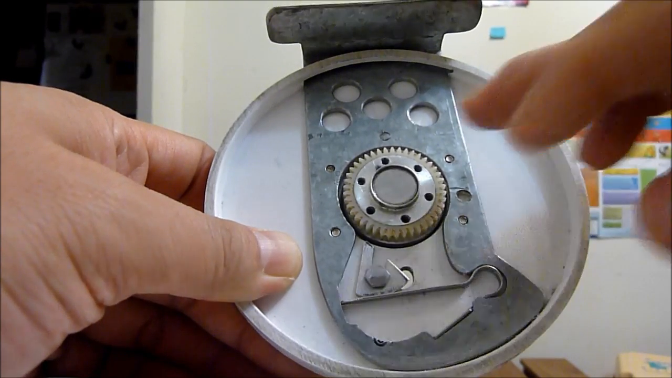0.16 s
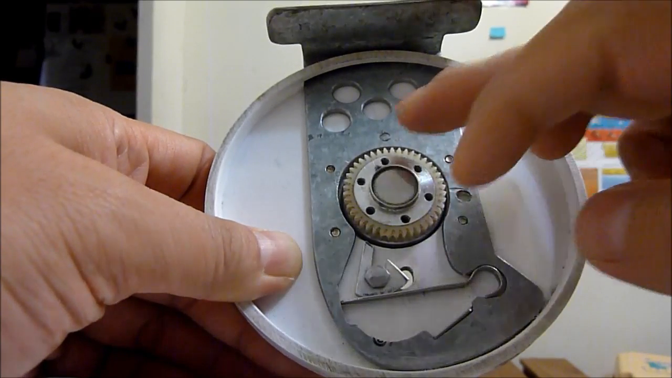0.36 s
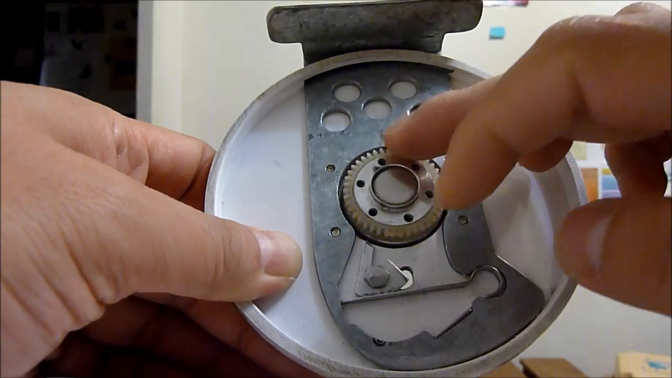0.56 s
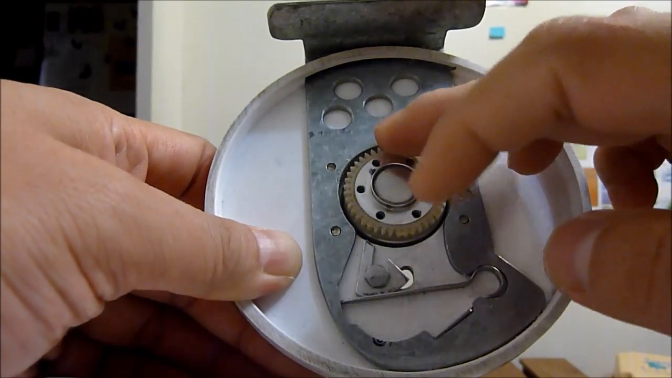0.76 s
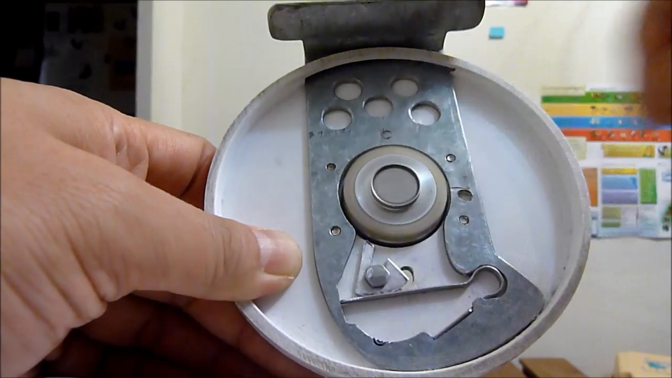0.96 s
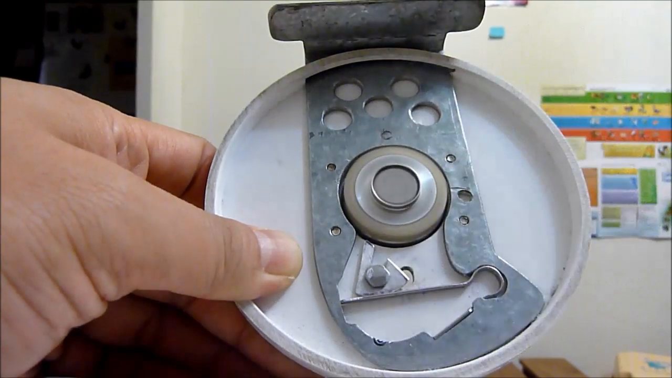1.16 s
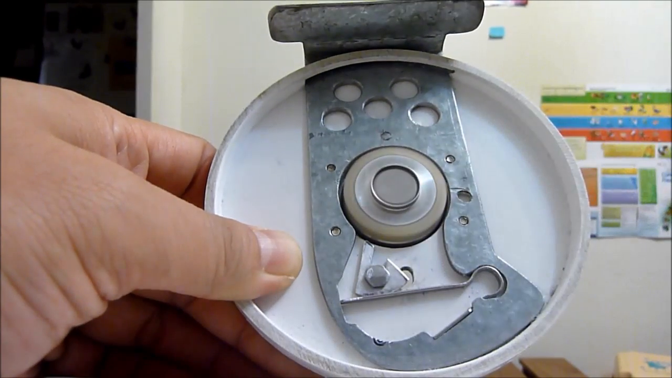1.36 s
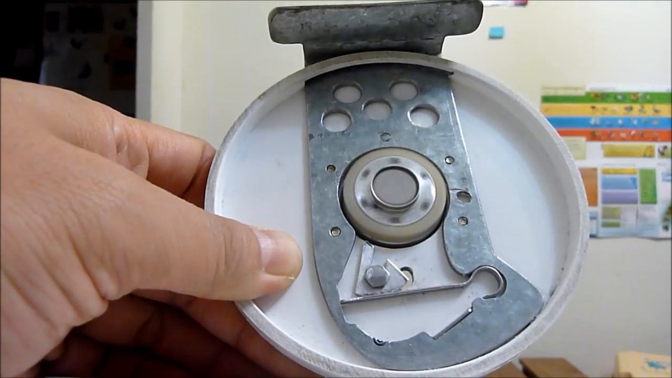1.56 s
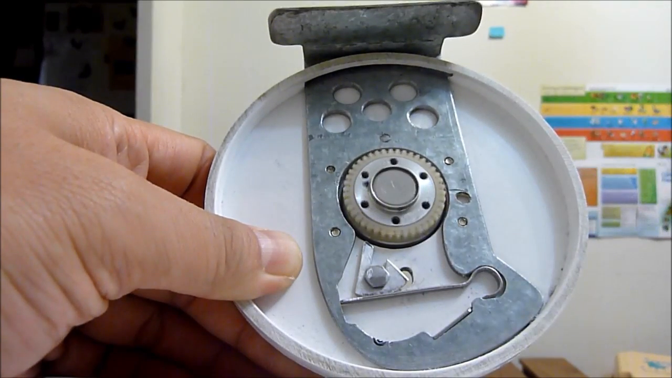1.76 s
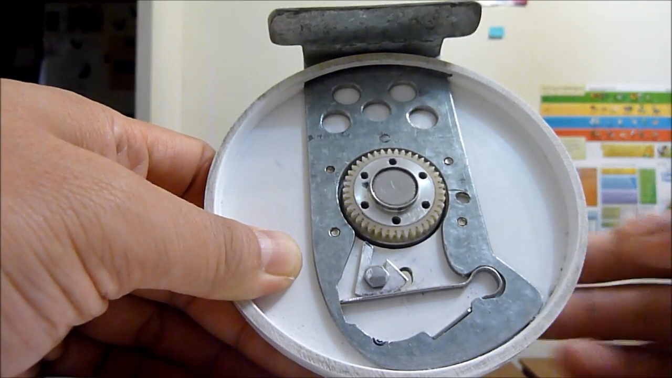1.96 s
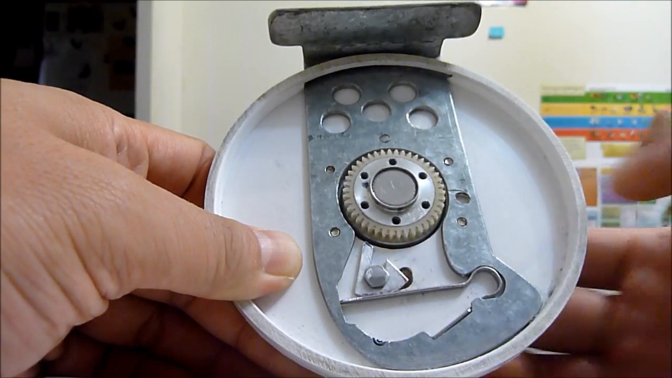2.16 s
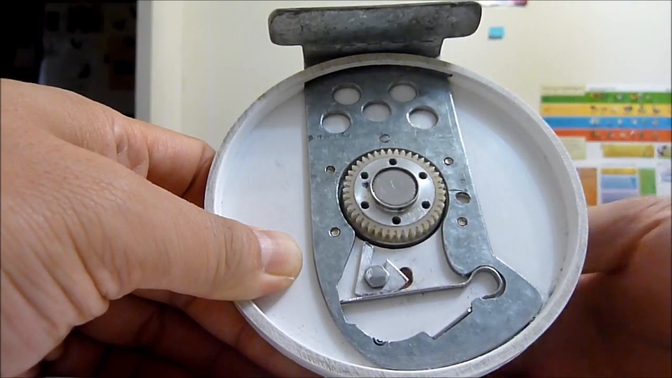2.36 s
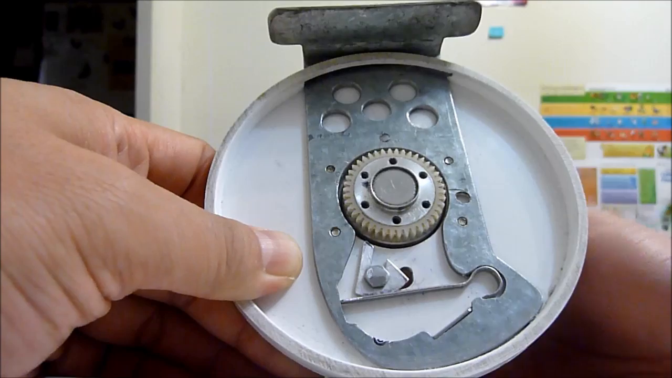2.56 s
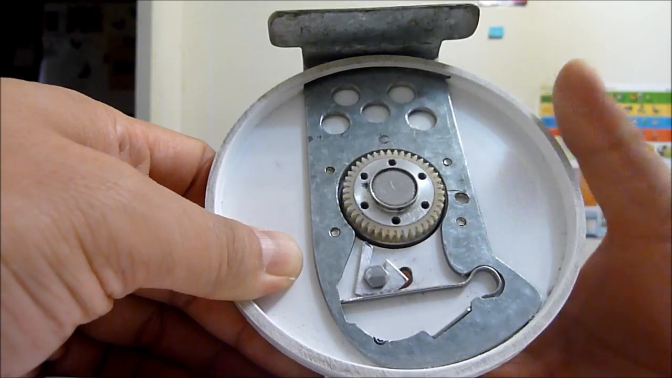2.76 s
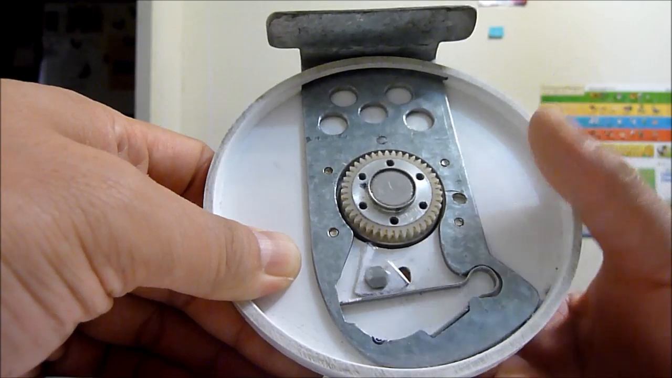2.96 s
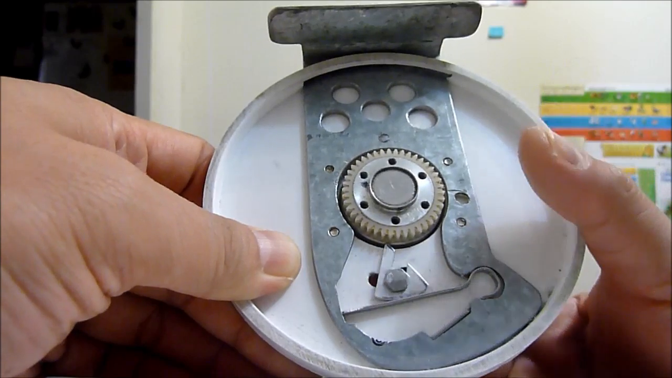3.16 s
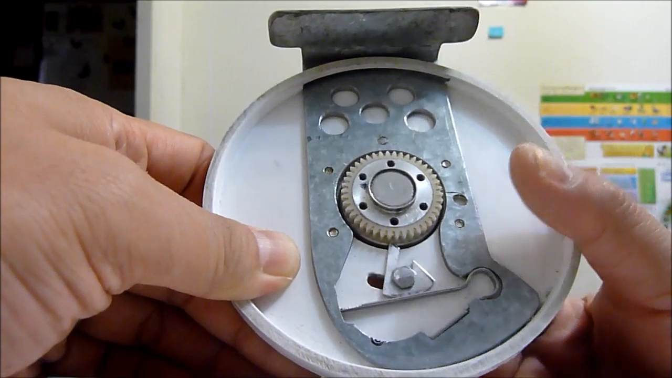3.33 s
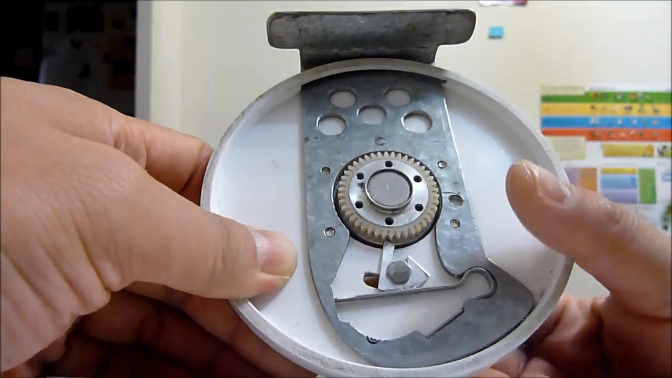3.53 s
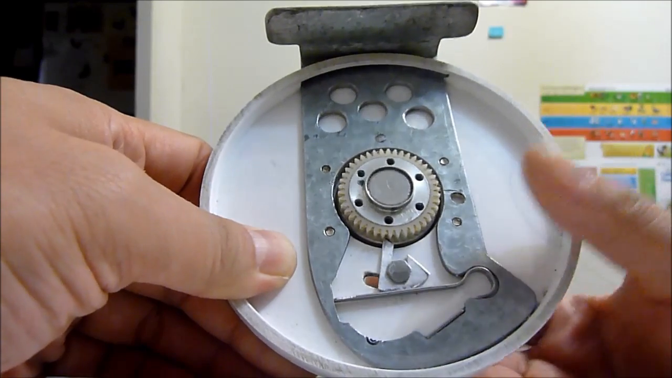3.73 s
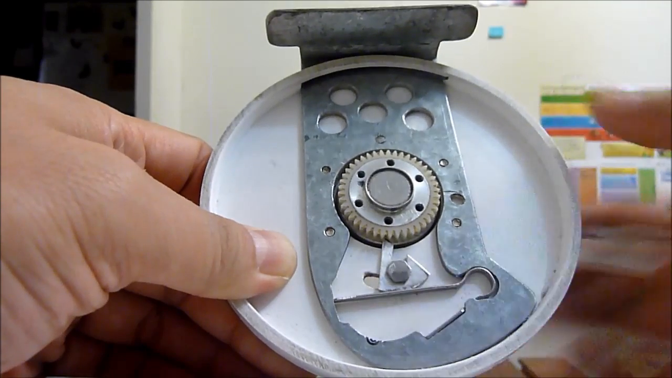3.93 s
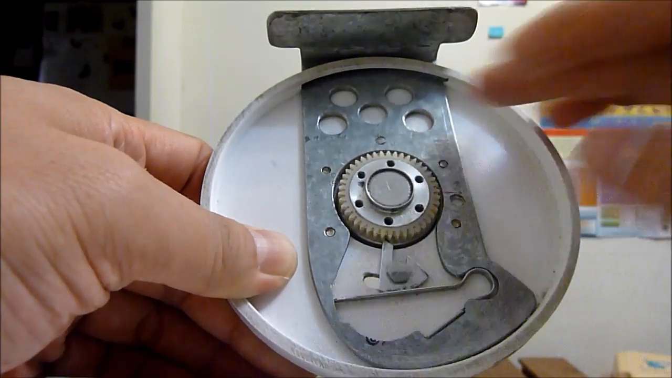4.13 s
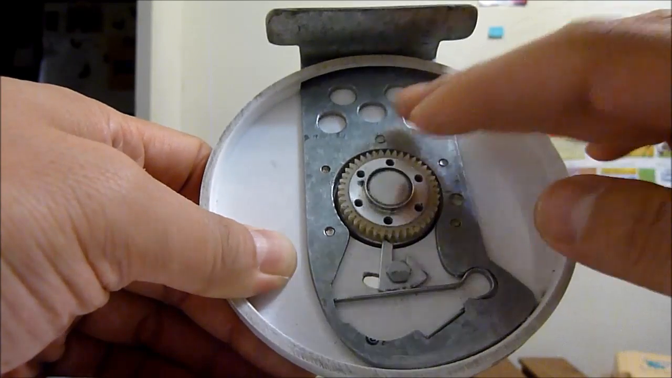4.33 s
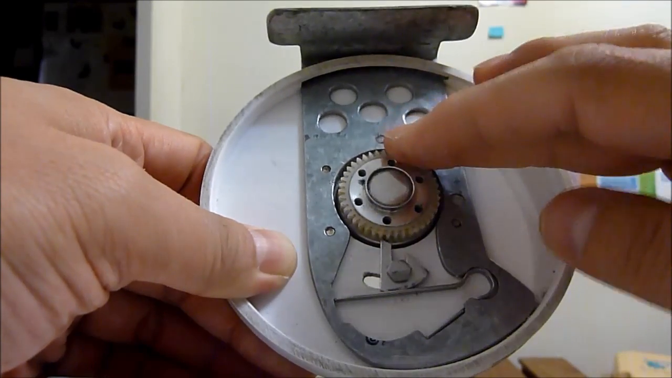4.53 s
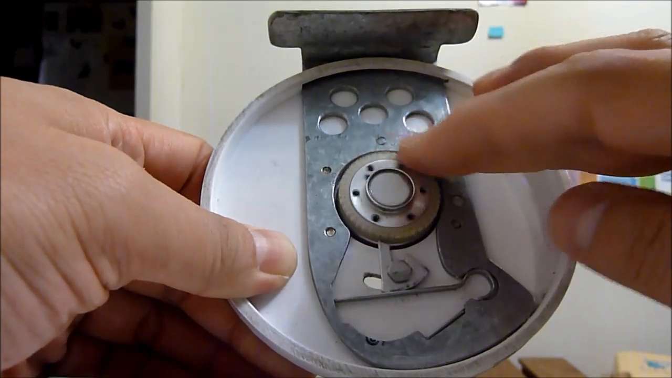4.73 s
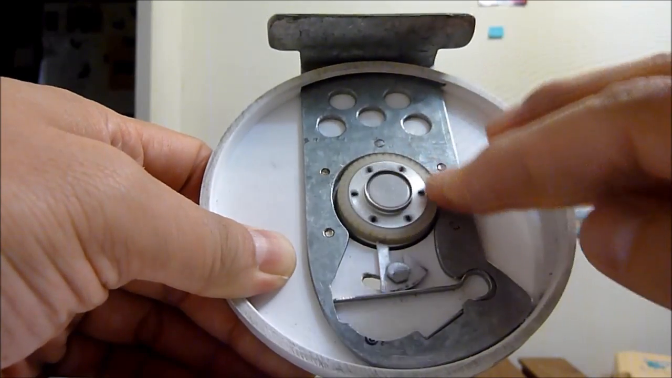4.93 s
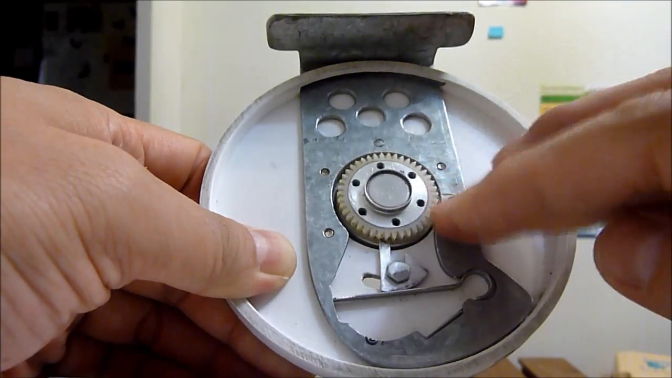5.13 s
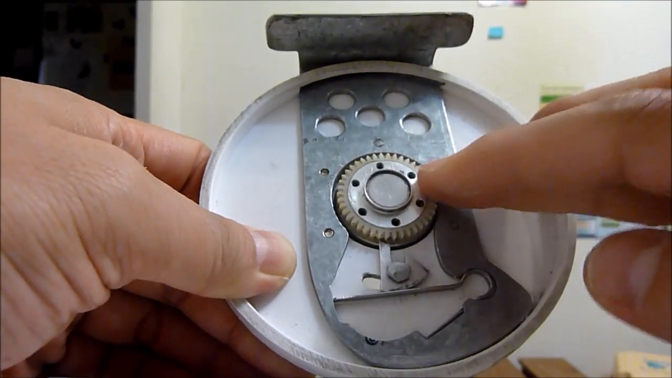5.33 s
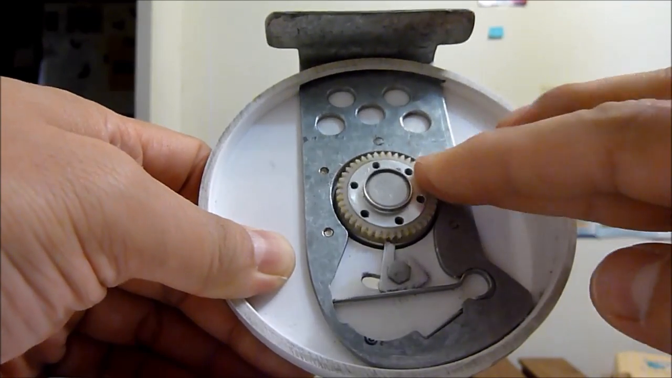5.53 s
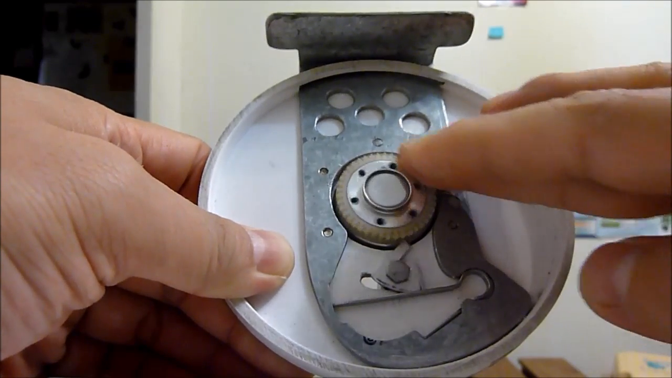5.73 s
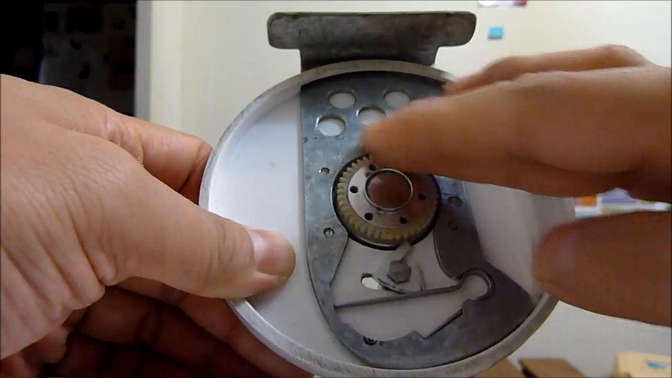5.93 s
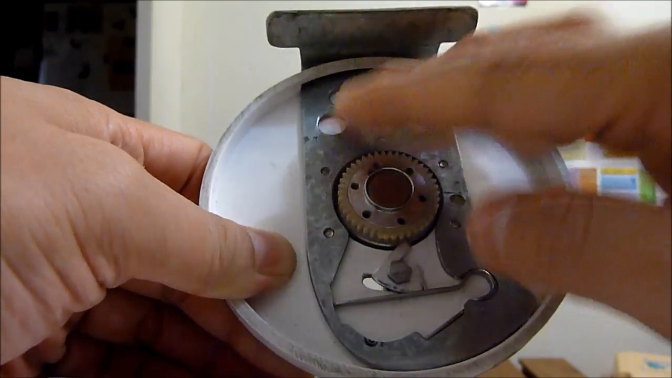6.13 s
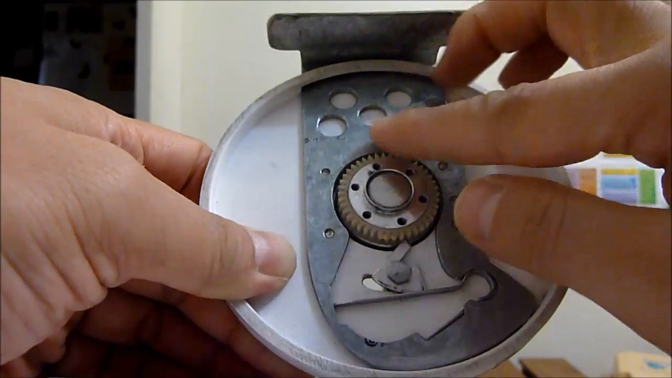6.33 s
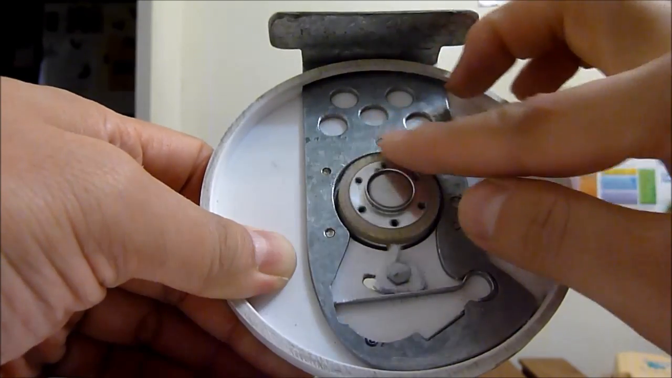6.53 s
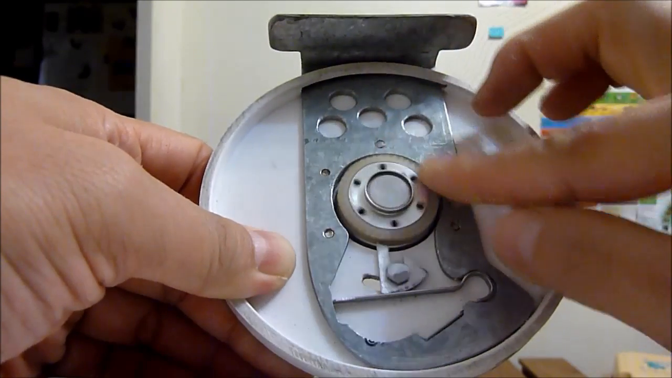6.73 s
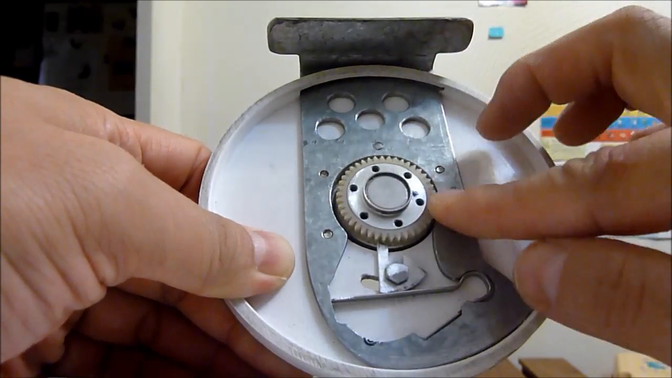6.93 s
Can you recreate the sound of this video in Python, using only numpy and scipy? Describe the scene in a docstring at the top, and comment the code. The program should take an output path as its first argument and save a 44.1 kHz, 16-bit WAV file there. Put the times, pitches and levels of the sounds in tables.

```python
"""A small room, with an open fishing reel handled close to a narrow-band stereo microphone.
A finger spins the free spool, the hand knocks and rubs on the frame while it slides the pawl in,
then turns the gear in three short bursts: the sprung pawl snaps over each tooth and rings the metal.
Far off, over steady room noise, a small bird or insect chirps at an even pace."""
import sys
import numpy as np
from scipy import signal
from scipy.fft import rfft, irfft, next_fast_len
from scipy.io import wavfile

SR = 44100
rng = np.random.default_rng(int(sys.argv[2]) if len(sys.argv) > 2 else 0)


def transcribe(signal):
    """Save signal, clipped to [-1, 1], as a 16-bit WAV file at the path in sys.argv[1]."""
    frames = np.atleast_2d(signal).T
    limited = np.clip(frames, -1, 1)
    pcm = np.round(limited * 32767).astype(np.int16)
    wavfile.write(sys.argv[1], SR, pcm)


N = 308259
TIME = np.arange(N) / SR
FREQ = np.fft.rfftfreq(N, 1 / SR)


def pawl(slip_s=0.00082, slip_db=-15, chatter_s=0.0011, chatter_db=-9,
         rebound_s=0.0016, rebound_db=-13, housing_s=0.002175, housing_db=-17):
    """The pawl slips off a tooth, slams into the next, chatters and rebounds; the housing hums after."""
    # Ring of pawl, spring and gear. Each row: pitch in Hz, width in Hz, level in dB.
    reel_modes = [(727, 120, -46), (923, 53, -11), (1617, 100, -12), (2435, 230, -12), (2713, 67, -29),
                  (3264, 115, -4), (3880, 230, -1), (4446, 250, 6.5), (4950, 350, 4.5), (5630, 370, 2.5),
                  (6050, 380, -4.5), (6930, 210, -15), (6850, 220, -24)]
    # Hum of the shallow housing. Each row: pitch in Hz, width in Hz, level in dB.
    housing_modes = [(500, 620, -22), (621, 46, 4), (732, 65, 1.5), (783, 43, 1), (970, 72, 1.5),
                     (1864, 230, -3.5), (2470, 780, -1.5)]
    lead = 64  # samples ahead of the blow
    out, t = np.zeros(N), (np.arange(4096) - lead) / SR
    for s, db, bass_db, treble_db, lean_db in teeth():
        slip_luck, rebound_luck, strength_luck = rng.standard_normal(3)
        slip_at = max(lead - int(slip_s * SR * (1 + .2 * slip_luck)), 0)
        rebound_at = lead + int(abs(rebound_s * SR * (1 + .25 * rebound_luck)))
        chatter = rng.standard_normal(len(t)) * (t > 0) * np.exp(-np.abs(t) / chatter_s)
        force = undb(chatter_db) * chatter / np.linalg.norm(chatter)
        force[lead] += 1
        force[slip_at] += undb(slip_db)
        force[rebound_at] += undb(rebound_db + 2 * strength_luck)
        # each tooth is met at a slightly different spot, so the modes share the blow differently
        share_hz = [2600, 3800, 4400, 4900, 5500, 6100]
        share_db = [bass_db, 0, lean_db, -lean_db, 0, treble_db]
        modes = [(hz, width, mode_db + 3 * rng.standard_normal() + np.interp(hz, share_hz, share_db))
                 for hz, width, mode_db in reel_modes]
        add(out, s - lead / SR, burst(resonate(force, modes), db))
        hum = butter(resonate(force, housing_modes), 2700, "low")
        add(out, s - lead / SR + housing_s, burst(hum, db + housing_db + bass_db / 2))
    return out


def teeth(bass_rise_db_per_s=44.5, breakaway_db=0.9, breakaway_bass_db=9, seating_s=0.02):
    """Yield each snap's time, level and tone: along a push they weaken, and deepen as the finger presses."""
    # Teeth passing the pawl. Each row: the times in seconds for one push of the finger.
    teeth_s = [
        [4.7314, 4.7625, 4.7955, 4.8204, 4.8514, 4.879, 4.9031, 4.9308, 4.96, 4.9857, 5.008, 5.0649],
        [5.761, 5.7989, 5.845, 5.8776, 5.909],
        [6.656, 6.6825, 6.7123, 6.7366, 6.7639, 6.7866, 6.805, 6.823, 6.839, 6.855, 6.8923],
    ]
    # Pushes on the gear. Each row: level in dB, sag in dB per second, extra bass in dB,
    # extra treble in dB, seconds until the pawl is seated.
    pushes = [(-15.5, 19.5, -6.5, 1, 0.11), (-17.5, 9.5, -1.5, 9, .2), (-15, 28, -5.5, 9, .04)]
    for times, (db, sag, bass_db, treble_db, seated_s) in zip(teeth_s, pushes):
        for s in times:
            age = s - times[0]
            first = s == times[0]  # breaks free from rest: harder, with more bass
            level = db - sag * age + first * breakaway_db + 1.18 * rng.standard_normal()
            bass = bass_db + bass_rise_db_per_s * age + first * breakaway_bass_db
            treble = treble_db + 2.5 * rng.standard_normal()
            # as the pawl seats itself, the ring leans from the 4.9 kHz mode to the 4.4 kHz mode
            lean = 3.6 * np.tanh((age - seated_s) / seating_s)
            yield s, level, bass, treble, lean


def pings(rise_s=0.0016, fade_s=0.0039):
    """A tooth grazes the pawl without passing; the gear rings softly, a little lower under a finger."""
    # Grazes. Each row: start in seconds, level in dB, pitch ratio.
    grazes = [(1.03, -52, 0.96), (1.255, -50, 0.95), (2.097, -50.5, 0.96), (2.149, -44.5, 0.96),
              (2.161, -40.5, 0.96), (2.825, -41, 0.96), (2.998, -53, 1), (6.068, -33, 0.88)]
    # The gear's light ring. Each row: pitch in Hz, width in Hz, level in dB.
    gear_modes = [(930, 220, 5.5), (2200, 280, 2), (3500, 580, -5), (4480, 170, 16.5), (4270, 130, -12),
                  (5090, 130, -30), (5870, 590, -26), (6530, 300, -24)]
    out, t = np.zeros(N), np.arange(4096) / SR
    for s, db, pitch in grazes:
        force = grains(len(t), spread_db=2.5) * (1 - np.exp(-t / rise_s)) * np.exp(-t / fade_s)
        modes = [(hz * pitch, width, mode_db) for hz, width, mode_db in gear_modes]
        add(out, s, burst(resonate(force, modes), db))
    return out


def frame(force, db, contact_hz, shell_db=-2, ring_db=1):
    """A force moves the frame's body, flexes its shell and rings its metal; a soft contact is duller."""
    # Resonances of the hand-held frame, in three groups. Each row: pitch in Hz, width in Hz, level in dB.
    body_modes = [(178, 14, -7.5), (324, 570, -4.5), (543, 188, 3), (797, 21, 4)]
    shell_modes = [(1050, 220, -3.5), (1500, 240, 9), (2050, 1700, 0.5), (2830, 540, -4.5)]
    ring_modes = [(4090, 1000, 16.5), (4527, 120, 12.5), (5100, 500, 17.5), (5900, 270, 20.5),
                  (6640, 400, -49)]
    body = butter(resonate(force, body_modes), [115, 1200], "band")
    shell = butter(resonate(force, shell_modes), [800, 2900], "band", order=4)
    ring = butter(resonate(force, ring_modes), 3300, "high", order=3)
    whole = burst(body, db) + burst(shell, db + shell_db) + burst(ring, db + ring_db)
    return butter(whole, contact_hz, "low", order=3)


def knocks(rattle_db=4, scrape_db=-9):
    """A short scrape leads into a light blow on the frame, and loose parts rattle after it."""
    # Blows. Each row: time in seconds, level in dB, rattle time in seconds, cut-off in Hz.
    blows = [(.905, -37.5, 0.0075, 1500), (0.9117, -40, 0.0017, 9000), (2.6154, -40.5, 0.006, 5250),
             (3.099, -43.5, 0.0042, 750), (3.125, -40.5, 0.0018, 2200), (3.1414, -41, 0.0033, 4600),
             (3.157, -37.5, 0.0053, 4600), (3.2155, -38, .0004, 2200), (3.3001, -35, 0.0024, 9000),
             (3.312, -39, 0.0025, 8100), (3.363, -39.5, 0.0017, 1800), (3.411, -42, 0.00038, 1900),
             (3.477, -52.5, .0026, 4530), (3.51, -52, 0.0041, 3700), (3.781, -55.5, 0.0037, 8000),
             (4.185, -44, .0095, 5900), (6.069, -41, 0.0062, 9070), (6.317, -44, 0.0062, 1200)]
    lead = 882  # samples of scrape
    out, t = np.zeros(N), (np.arange(4096) - lead) / SR
    for s, db, rattle_s, contact_hz in blows:
        rattle = grains(len(t), spread_db=4) * np.exp(-np.abs(t) / rattle_s)
        rattle[:lead] *= undb(scrape_db)
        force = undb(rattle_db) * np.sqrt(rattle_s / 0.0031) * rattle / np.linalg.norm(rattle)
        force[lead] += 1
        add(out, s - lead / SR, frame(force, db, contact_hz))
    return out


def rubs(rise_s=0.00067):
    """Skin sticks and slips on the frame, then slides to rest."""
    # Slides. Each row: start in seconds, level in dB, fade time in seconds, cut-off in Hz.
    slides = [(.92, -49, 0.074, 7000), (2.731, -46, 0.015, 4000), (2.856, -44, 0.01, 1400),
              (2.886, -38.5, 0.025, 3080), (2.955, -47, 0.084, 4200), (3.136, -37, 0.046, 900),
              (3.52, -49.5, 0.041, 3800), (3.742, -48, 0.019, 4000), (4.195, -37.5, 0.038, 2700),
              (4.225, -41.5, 0.078, 850), (4.306, -45, .024, 850), (5.591, -46.5, .015, 3500),
              (5.647, -47, 0.017, 4800), (5.735, -39, 0.028, 2500), (5.979, -44, 0.072, 1300),
              (6.426, -43, 0.016, 2700), (6.66, -35.5, 0.16, 800)]
    out, t = np.zeros(N), np.arange(SR // 2) / SR
    for s, db, fade_s, contact_hz in slides:
        force = grains(len(t), spread_db=4) * (1 - np.exp(-t / rise_s)) * np.exp(-t / fade_s)
        add(out, s, frame(force, db, contact_hz))
    return out


def bump(start_s=1.28, db=-33, soft_hz=640, push_s=0.008):
    """One soft, heavy contact, drawn out over a few milliseconds, wakes only low modes."""
    # Modes of the dull bump. Each row: pitch in Hz, width in Hz, level in dB.
    low_modes = [(178, 22, 7.3), (254, 77, 6), (335, 32, 3.2), (406, 47, 10.4), (497, 35, 3)]
    out, t = np.zeros(N), np.arange(SR // 2) / SR
    force = rng.standard_normal(len(t)) * np.exp(-t / push_s)
    force /= np.linalg.norm(force)
    force[0] += 1
    thud = butter(resonate(force, low_modes), [115, soft_hz], "band", order=5)
    add(out, start_s, burst(thud, db))
    return out


def spool(start_s=0.877, db=-48, rise_s=0.026, coast_s=0.22, fade_db_per_s=56, turn_hz=33, wobble_db=3):
    """Flicked up to speed, the free spool scrapes its shaft, harder once a turn, and runs down."""
    # Resonances of the whirr. Each row: pitch in Hz, width in Hz, level in dB.
    whirr_modes = [(630, 460, 7), (1500, 1800, -7), (4200, 350, 11.5), (5400, 440, -1), (6400, 700, -45)]
    age = np.maximum(TIME - start_s, 0)
    turns = np.cumsum(turn_hz * np.exp(-0.5 * age)) / SR
    force = grains(N, spread_db=5.5) * undb(wobble_db * np.sin(2 * np.pi * turns))
    envelope = np.minimum(age / rise_s, 1) * undb(db - fade_db_per_s * np.maximum(age - coast_s, 0))
    return unit(resonate(force, whirr_modes)) * envelope


def grip(per_s=1.6, db=-55, spread_db=2, fade_s=0.017):
    """Now and then the fingers that hold the reel shift a little on the frame."""
    out, t = np.zeros(N), np.arange(SR // 4) / SR
    for s in rng.uniform(0, N / SR, int(per_s * N / SR)):
        force = grains(len(t), spread_db=3) * t * np.exp(-t / fade_s)
        add(out, s, frame(force, db + spread_db * rng.standard_normal(), contact_hz=2600))
    return out


def bird(first_s=0.2, every_s=0.3, length_s=0.054, start_hz=6100, end_hz=5300, db=-59.5, echo_s=0.025):
    """Thin falling chirps from far off, smeared by the echoes along their way."""
    out, t = np.zeros(N), np.arange(int(length_s * SR)) / SR
    echo_t = np.arange(SR // 8) / SR
    trill_hz = 350 * np.sin(2 * np.pi * 170 * t)
    envelope = np.sin(np.pi * t / length_s) ** .5
    for s in np.arange(first_s, N / SR, every_s):
        hz = np.linspace(start_hz, end_hz, len(t)) * (1 + .02 * rng.standard_normal())
        chirp = np.sin(2 * np.pi * np.cumsum(hz + trill_hz) / SR) * envelope
        echoes = rng.standard_normal(len(echo_t)) * np.exp(-echo_t / echo_s)
        smeared = signal.fftconvolve(chirp, echoes / np.linalg.norm(echoes))
        add(out, s, undb(db + rng.standard_normal()) * smeared)
    return out


def room(x, low_t60_s=0.25, high_t60_s=0.36, first_s=0.0021, build_s=0.0023, side_db=-3):
    """The small room answers with a few near reflections and a short diffuse tail."""
    # Colour of the tail. Each row: frequency in Hz, level in dB.
    tail_colour = [(100, -22.5), (300, 1), (430, -11), (660, -8), (800, -7), (930, -23), (1300, -7.5),
                   (2500, -13.5), (4500, -19), (7000, -18.5)]
    # Echoes off nearby surfaces. Each row: delay in seconds, level in dB.
    reflections = [(.0091, -30), (.0099, -23), (0.0112, -16.5), (0.0145, -22.5), (0.017, -29), (0.018, -35),
                   (0.0245, -26.5)]
    age = np.maximum(TIME - first_s, 0)
    build = 1 - np.exp(-age / build_s)
    fades = [build * undb(-60 * age / t60) for t60 in (low_t60_s, high_t60_s)]
    low_fade, high_fade = [fade / np.linalg.norm(fade) for fade in fades]
    tails = []
    for _ in range(2):  # mid, then side
        noise = colour(rng.standard_normal(N), tail_colour)
        low = butter(noise, 1500, "low", order=1)
        tails.append((low * low_fade + (noise - low) * high_fade)[:SR])
    response = stereo(tails[0], undb(side_db) * tails[1])
    for delay_s, db in reflections:
        response[[0, 1], int(delay_s * SR) + rng.integers(0, 6, 2)] += undb(db)
    return signal.fftconvolve(x[None], response, axes=1)[:, :N]


def room_tone(db=-54.5):
    """Steady room noise: the bass is alike on both sides, the treble is wide."""
    # Spectrum of the room noise. Each row: frequency in Hz, relative level in dB.
    air = [(30, -31), (60, -39), (100, -18.5), (170, -7.5), (250, -3.5), (297, 2.5), (360, -2), (600, 0),
           (810, 0), (1100, -7), (1500, -8), (2600, -14), (6000, -17), (7000, -20.5), (7700, -38)]
    # Stereo width. Each row: frequency in Hz, side against mid in dB.
    width = [(100, -15.5), (300, -9.5), (650, -4), (1400, 2), (3100, 6), (6800, -1)]
    mid = colour(rng.standard_normal(N), air)
    side = colour(colour(rng.standard_normal(N), air), width)
    return stereo(mid, side) / np.std(mid) * undb(db)


def microphone_ports(x, lag_db=-5, shadow_db=-13):
    """Two close ports: one hears a fraction of a sample sooner, and the mids bend round the casing."""
    mids = butter(x, [900, 3000], "band")
    bend = np.imag(signal.hilbert(mids, next_fast_len(N)))[:N]
    return stereo(x, undb(lag_db) * np.gradient(x) / 2 + undb(shadow_db) * bend)


def limiter(x, threshold=0.88, release_s=0.5):
    """The gain drops at once on a loud snap and is still down for those that follow."""
    log_peak = np.log(np.abs(x).max(axis=0) + 1e-9)
    held = np.exp(np.maximum.accumulate(log_peak + TIME / release_s) - TIME / release_s)
    return x * np.minimum(1, threshold / held)


def undb(db):
    return 10 ** (np.asarray(db) / 20)


def unit(x):
    """Scale to rms 1."""
    return x / np.sqrt(np.mean(x ** 2))


def stereo(mid, side):
    return np.array([mid + side, mid - side])


def burst(x, db):
    """Give a short sound the energy of 10 ms at the level db."""
    return x * undb(db) * np.sqrt(SR / 100 / np.sum(x ** 2))


def add(track, s, x):
    """Mix x into the track at s seconds."""
    i = int(round(s * SR))
    track[i:i + len(x)] += x[:N - i]


def colour(x, points):
    """Shape a full-length signal by (Hz, dB) points."""
    hz, db = np.transpose(points)
    return irfft(rfft(x) * undb(np.interp(np.log(FREQ + 1), np.log(hz), db)), N)


def butter(x, hz, kind, order=2):
    return signal.sosfilt(signal.butter(order, hz, kind, fs=SR, output="sos"), x)


def resonate(x, modes):
    """Drive parallel resonances (Hz, width Hz, dB)."""
    return sum(undb(db) * signal.lfilter(*signal.iirpeak(hz, hz / width, fs=SR), x)
               for hz, width, db in modes)


def grains(size, spread_db):
    """Tiny contacts of very unequal strength, rms 1."""
    return unit(rng.standard_normal(size) * undb(spread_db * np.minimum(rng.exponential(size=size), 4)))


def scene():
    """The reel right at the microphone, the room around it, the chirps in the distance."""
    snaps = butter(pawl(), 7000, "low", order=4)  # the pawl's contact time softens the very top
    snaps = butter(snaps, 140, "high")
    reel = snaps + pings() + knocks() + rubs() + grip() + spool() + bump()
    return microphone_ports(reel) + room(reel) + room_tone() + bird()


def record(dry, drive_db=1, mic_top_hz=7650, lopsided=0.014):
    """A narrow-band microphone, slightly lopsided on peaks, then a limiter, a bass cut and a top cut."""
    x = signal.sosfilt(signal.ellip(10, .3, 75, mic_top_hz, fs=SR, output="sos"), undb(drive_db) * dry)
    x = x + lopsided * butter(x ** 2, 3000, "high", order=4)
    x = butter(limiter(x), 55, "high")
    return signal.sosfilt(signal.ellip(8, .2, 70, 16300, fs=SR, output="sos"), x)


dry = scene()
out = record(dry)
transcribe(out)
```